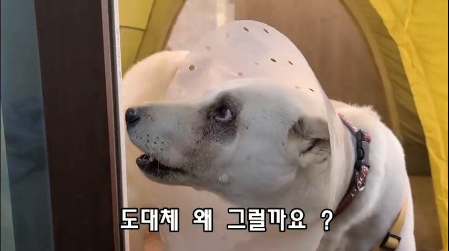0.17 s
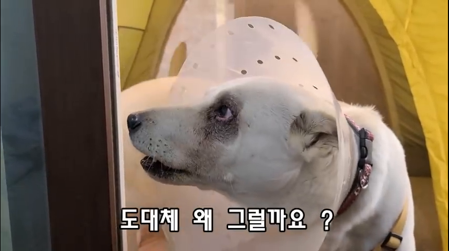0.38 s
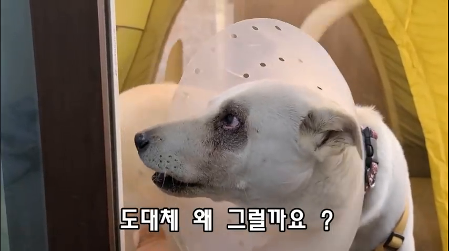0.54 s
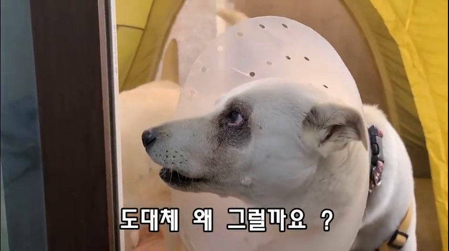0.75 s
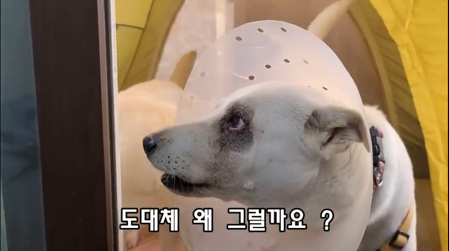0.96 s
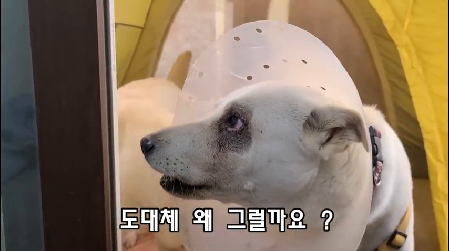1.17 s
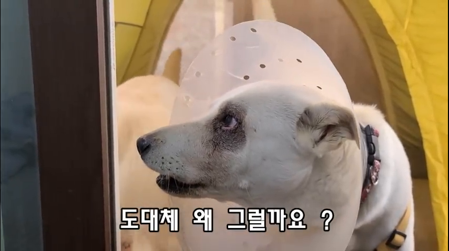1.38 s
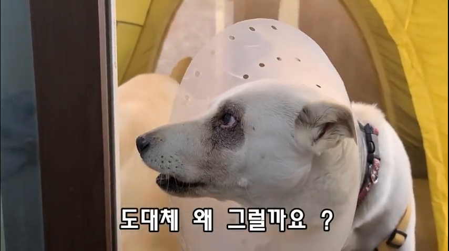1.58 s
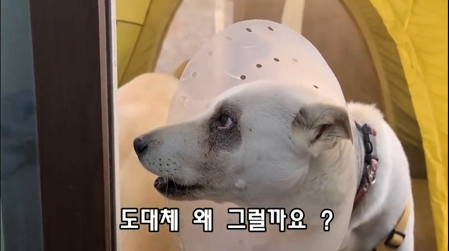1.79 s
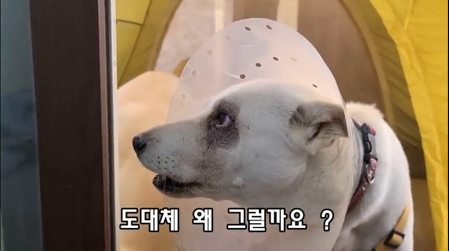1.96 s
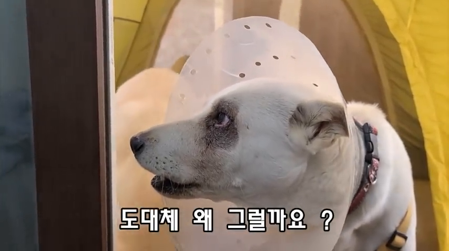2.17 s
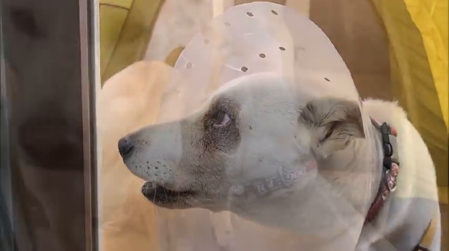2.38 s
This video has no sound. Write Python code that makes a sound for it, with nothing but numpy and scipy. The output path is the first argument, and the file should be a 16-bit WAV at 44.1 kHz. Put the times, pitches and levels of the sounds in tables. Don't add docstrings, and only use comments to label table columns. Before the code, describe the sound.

Close dog growl rising into one yelping bark, falling to a low growl, then growling again

```python
import sys
import numpy as np
from scipy import signal
from scipy.fft import rfft, irfft, next_fast_len
from scipy.io import wavfile
from scipy.ndimage import uniform_filter1d, map_coordinates

SR = 44100
rng = np.random.default_rng(int(sys.argv[2]) if len(sys.argv) > 2 else 0)


def gain_from_db(level_db):
    decades = np.asarray(level_db, float) / 20
    return 10 ** decades


def transcribe(u):
    v = np.clip(np.atleast_2d(u).T, -1, 1)
    q = np.round(v * 32767).astype(np.int16)
    wavfile.write(sys.argv[1], SR, q)


N = 107118


def unit(x):
    return x / np.sqrt(np.mean(x ** 2) + 1e-20)


def along(points, hz):
    f, v = np.transpose(points)
    return np.interp(np.log(hz + 1), np.log(f + 1), v)


def curves(tables):
    s, *cols = np.transpose(sum(tables, []))
    return [np.interp(np.arange(N) / SR, s, c) for c in cols]


def wobble(rate):
    knots = rng.standard_normal(int(N * rate / SR) + 4)
    return map_coordinates(knots, [np.arange(N) * rate / SR])


def bump(s, width):
    return np.exp(-((np.arange(N) / SR - s) / width) ** 2)


def stages(shifts_s):
    stage = np.searchsorted(shifts_s, np.arange(N) / SR)
    return stage == np.arange(len(shifts_s) + 1)[:, None]


def filtered(x, response):
    m = next_fast_len(N + SR // 2)
    return irfft(rfft(x, m) * response(np.fft.rfftfreq(m, 1 / SR)), m)[..., :N]


def tract(peaks, f):
    return sum((-1) ** k * gain_from_db(db) * 1j * f * w / (c * c - f * f + 1j * f * w)
               for k, (c, w, db) in enumerate(peaks))


def notch(shape, f):
    c, inner, outer = shape
    return (c * c - f * f + 1j * f * inner) / (c * c - f * f + 1j * f * outer)


def spread(apart):
    shared, own = rng.standard_normal((2, N))
    return shared + apart * own * np.array([[1], [-1]])


# f/Hz, level/dB (per Hz)
AIR_COLOUR = [(25, -15.5), (70, -2), (170, -18), (800, -29), (4300, -36), (6300, -55.5), (12300, -46.5),
              (15500, -52)]
# f/Hz, likeness 0-1
AIR_LIKENESS = [(60, 0.74), (240, 0.97), (950, 0.13), (3770, 0.04), (15000, 0.029)]
# f/Hz, level/dB (rms)
HUM_TONES = [(199.2, -74), (285.3, -78.5), (495.3, -87.5)]


def air():
    turn = lambda f: np.arccos(np.clip(along(AIR_LIKENESS, f), -1, 1)) / 2
    colour = lambda f: gain_from_db(along(AIR_COLOUR, f)) * [np.cos(turn(f)), np.sin(turn(f))]
    mid, side = filtered(rng.standard_normal((2, N)), colour)
    t = np.arange(N) / SR
    hum = sum(gain_from_db(db + 4.0 + 0.82 * wobble(0.9)) * np.sin(2 * np.pi * hz * t) for hz, db in HUM_TONES)
    level = gain_from_db(-64.5 + 0.43 * wobble(6.9))
    return level * np.array([mid + side, mid - side]) / np.std(mid) + hum


# f/Hz, t/s
ECHO_TIMES = [(200, 0.57), (2000, 0.098), (10000, 0.084)]
# f/Hz, level/dB
ECHO_COLOUR = [(300, -34.5), (800, -10.5), (3000, -7.5), (8000, -0.5)]


def shelter(x):
    bass_top_db = -27
    hz, t, z = signal.stft(rng.standard_normal((2, SR // 3)), SR, nperseg=256)
    tail = signal.istft(z * gain_from_db(-60 * t / along(ECHO_TIMES, hz)[:, None]), SR, nperseg=256)[1]

    def colour(f):
        db = along(ECHO_COLOUR, f)
        return gain_from_db(np.where(f < 700, np.minimum(db, bass_top_db), db))

    delayed = np.pad(filtered(x.mean(axis=0), colour), (300, 0))
    return signal.fftconvolve(delayed[None], tail / np.linalg.norm(tail[0]), axes=1)[:, :N]


# t/s, f/Hz, level/dB, time to fall 60 dB t/s
TAG_TICK = (.944, 4450, -64, .015)


def collar_tag():
    s, hz, db, t60 = TAG_TICK
    t = np.clip(np.arange(N) / SR - s, 0, 1)
    return gain_from_db(db - 60 * t / t60) * np.sin(2 * np.pi * hz * t)


# t/s, length t/s, level/dB
SNUFFLE_PUFFS = [
    (0.774, .06, -61),
    (0.866, .08, -78),
    (1.301, 0.26, -79),
    (1.577, 0.13, -72.5),
    (1.737, 0.176, -70.5),
    (1.867, .08, -75.5),
]
# f/Hz, width f/Hz, level/dB
SNOUT_PEAKS = [(480, 300, 0), (960, 200, -4), (1650, 300, -5), (2530, 300, -4)]


def snuffles():
    puffs = sum(gain_from_db(db) * bump(s, length / 2) for s, length, db in SNUFFLE_PUFFS) * gain_from_db(3.4 * wobble(90))
    return puffs * unit(filtered(rng.standard_normal(N), lambda f: tract(SNOUT_PEAKS, f) ** 2))


# t/s, width t/s, level/dB
SIGH_PUFFS = [
    (.745, 0.019, -54.5),
    (0.789, 0.027, -64),
]
# f/Hz, width f/Hz, level/dB
LIP_PEAKS = [(958, 49, -3.5), (1340, 100, -6), (1920, 91, -7), (2530, 88, 5.5), (3300, 120, -7),
             (3934, 51, -12), (4800, 90, -14.5), (5280, 66, -15)]


def sigh():
    puffs = sum(gain_from_db(db) * bump(s, width) for s, width, db in SIGH_PUFFS)
    return puffs * unit(filtered(rng.standard_normal(N), lambda f: tract(LIP_PEAKS, f)))


# f/Hz, level/dB (per Hz)
HISS_COLOUR = [(1180, -34), (2000, -14), (2200, -11.5), (5270, 0), (5940, -9.5), (6530, -1.5),
               (15500, -14.5)]


def blast(hz, db, gate):
    grows_db, lag_s = 13, 0.0033
    effort_db = uniform_filter1d(db, size=1323) - db.max()
    blast_db = np.roll(grows_db * np.log2(hz / hz.max()) + effort_db, round(lag_s * SR))
    hiss = unit(filtered(spread(.8) * (.5 + gate), lambda f: gain_from_db(along(HISS_COLOUR, f))))
    thud = unit(filtered(spread(.7), lambda f: f / (20 + f) / (1 + (f / 120) ** 2)))
    return gain_from_db(blast_db) * (gain_from_db(-26.5) * hiss + gain_from_db(-40) * thud)


# t/s, level/dB, level/dB of its octave over it
CHEST_LEVELS = [
    [(0, -42.5, 0.5), (.1, -34.5, 1), (.14, -41, 3.5), (.27, -41.5, 0), (.32, -43, -0.5), (.39, -40, -11.5),
     (.454, -37.5, 1), (.6, -35, -1.5), (.715, -34, -7.5), (.75, -40, -19), (.79, -72.5, -10)],
    [(1.885, -86, -8), (1.9, -71, 3), (1.925, -29, -4), (1.96, -32.5, -2.5), (2.33, -29.5, -5)],
]


def chest_tone(turns, loose, lead, choke_db, rough):
    chest_db, octave_db = curves(CHEST_LEVELS)
    low = np.sin(2 * np.pi * (turns + .27 * lead))
    octave_turns = 2 * (turns + .65 * (loose - turns)) - 0.5
    octave = gain_from_db(octave_db - .5 * choke_db) * np.sin(2 * np.pi * octave_turns)
    return np.sqrt(2) * gain_from_db(chest_db + 10 * rough * wobble(60)) * (low + octave)


# t/s, width t/s, level/dB
RASP_BURSTS = [
    (0, .02, -40),
    (.12, .008, -24),
    (.133, .008, -18),
    (.205, .008, -33),
]
# f/Hz, width f/Hz, level/dB
RASP_PEAKS = [(1040, 130, 0), (1350, 120, -3), (1700, 130, 1), (2220, 130, -2), (2540, 110, -1),
              (4500, 2500, -16)]


def rasps(gate):
    bursts = sum(gain_from_db(db) * bump(s, width) for s, width, db in RASP_BURSTS) * (.5 + gate)
    return bursts * unit(filtered(rng.standard_normal(N), lambda f: tract(RASP_PEAKS, f) ** 2))


# centre t/s, width t/s, level/dB
HALF_TONE = (.182, 0.02, -29.5)


def half_tone(loose):
    s, width, db = HALF_TONE
    return gain_from_db(db) * bump(s, width) * np.sin(np.pi * loose)


# f/Hz, width f/Hz, level/dB
JAW_PEAKS = [
    [(1320, 330, -11.5), (1841, 90, -6), (2352, 260, -17.5), (2510, 37, -5), (3208, 102, -13.5)],
    [(1353, 100, 2), (1798, 98, 0), (2210, 73, -3), (2710, 94, -26.5), (2890, 89, -7)],
    [(1400, 110, 3), (1739, 130, -9), (2210, 65, -1.5), (2650, 84, -29.5), (3017, 69, 0.5)],
]
JAW_SHIFTS = [1.3, 2.18]


def jaws(folds, breath, size, db, rough):
    shut = gain_from_db(-30 + (0.87 - 1) * (db - db.max()))
    blown = (folds + 2.2 * breath / (rough + 0.17)) * size * shut
    voice = np.zeros(N)
    for on, peaks in zip(stages(JAW_SHIFTS), JAW_PEAKS):
        for peak in peaks:
            patchy = blown * on * gain_from_db(3 * wobble(20))
            voice += filtered(patchy, lambda f: tract([peak], f))
    return voice


# f/Hz, width f/Hz, level/dB
MOUTH_PEAKS = [(934, 140, 12), (1460, 190, 2), (1556, 180, -1), (2280, 59, -10.5), (2504.6, 88, 1),
               (3180, 340, -8), (3330, 150, -16), (4450, 360, -14.5), (5550, 1600, -18.5),
               (6730, 2100, -21.5), (8850, 1600, -10), (11570, 4600, -25.5)]


def mouth(folds, breath, size, mouth_db):
    return filtered((folds + 3 * breath) * size * gain_from_db(mouth_db), lambda f: tract(MOUTH_PEAKS, f))


# f/Hz, width f/Hz, level/dB
THROAT_PEAKS = [
    [(371.7, 260, 3), (545, 260, 5)],
    [(353.5, 210, 0.5), (480, 190, 5.5)],
    [(405, 194.4, 5), (537, 280, 4.5)],
]
# f/Hz, width f/Hz, level/dB
NOSE_PEAKS = [
    [(900, 84, -26.5)],
    [(880, 113, -28)],
    [(916, 150, -19)],
]
THROAT_SHIFTS = [.6, 1.3]
# f/Hz, inner width f/Hz, outer
# width f/Hz
THROAT_BRANCH = (740, 89, 87)


def throat(folds, breath, size, hz):
    shapes = stages(THROAT_SHIFTS)

    def passed(f, i):
        ring = tract(THROAT_PEAKS[i], f) ** 3 * notch(THROAT_BRANCH, f) + tract(NOSE_PEAKS[i], f)
        return ring * np.exp(2j * np.pi * f * 0.005)

    overtones = np.arange(1, 9)[:, None] * hz
    gain = sum(on * passed(overtones, i) for i, on in enumerate(shapes))
    passes = uniform_filter1d(np.sqrt(np.sum(abs(gain) ** 2, axis=0) / 2), size=441)
    source = (folds + breath) * size / passes
    return sum(filtered(source * on, lambda f: passed(f, i)) for i, on in enumerate(shapes))


# t/s, depth level/dB, lead lost in cycles
CHOKE_MOMENTS = [(0.436, 5, 0.062), (0.468, 5, .06), (.53, 2.5, .02), (0.598, 4.5, 0.05), (1.945, 3, .2),
                 (1.975, 11.5, .3), (2.008, 7.5, .36), (2.037, 9.5, .38), (2.072, 3, 0.43),
                 (2.106, 16, 0.42), (2.145, 9.5, .33), (2.184, 12.5, .35), (2.222, 7.5, .33),
                 (2.255, 9, .3), (2.294, 10, .3), (2.335, 0.5, 0.28)]


def flutter():
    choke_s, run_up_s = .0078, .04
    t = np.arange(N) / SR
    s, db, lead = np.transpose(CHOKE_MOMENTS)[:, :, None]
    bells = bump(s, choke_s)
    run_s = np.minimum(np.diff(s, axis=0, prepend=0), run_up_s)
    run = np.clip(1 + (t - s) / run_s, 0, 1)
    back = np.cumsum(bells, axis=1) / bells.sum(axis=1, keepdims=True)
    return np.sum(db * bells, axis=0), np.sum(lead * (run - back), axis=0)


# t/s, f/Hz
VOICE_PITCH = [
    [(0, 189.7), (.048, 162.3), (.088, 207.9), (.113, 253.4), (.126, 405), (.138, 505.8)],
    [(.16, 562.2), (.188, 603.8), (.201, 624.4), (.214, 565.8), (.222, 503.8), (.235, 391.3), (.25, 285.2),
     (.274, 188.5)],
    [(.302, 156.1), (.37, 142), (.454, 128.6), (.586, 120.8), (.674, 115.8), (.722, 110.6), (.78, 92.65)],
    [(1.896, 102.4), (1.924, 103.2), (1.956, 111.7), (1.99, 115.7), (2.07, 118.8), (2.2, 119.3),
     (2.33, 118.8)],
]
# t/s, throat level/dB, mouth level/dB, roughness 0-1
VOICE_EFFORT = [
    [(0, -13, -30.5, 0.18), (.018, -32, -25.5, 0.37), (.06, -31, -37, 0.23), (.075, -18, -31.5, 0.1),
     (.112, -12.5, -26.5, 0.21), (.122, -14.5, -14.5, 0), (.134, -11, -20, 0)],
    [(.143, -5, -16, 0.09), (.155, -8, -14, 0.07), (.175, -5.5, -17.5, 0.07), (.197, -10.5, -11.5, 0.04),
     (.203, -16.5, -8.5, 0.14), (.206, -23.5, -1, 0.2), (.214, -5.5, -19, 0.2), (.224, -13.5, -20.5, 0),
     (.229, -20, -12.5, 0.2)],
    [(.249, -18, -26, 0.5), (.26, -17.5, -27, 0.52), (.285, -28, -46, 0.24), (.33, -27, -56, 0.11),
     (.42, -26, -59, 0.06), (.5, -29, -53, 0.09), (.586, -32.5, -62, 0.21), (.64, -28, -59.5, 0),
     (.722, -30, -50.5, 0.24), (.745, -53, -16.5, 0.23), (.8, -88, -15.5, 0.42)],
    [(1.885, -67, -36.5, 0.37), (1.899, -55.5, -31.5, 0.32), (1.904, -34.5, -43, 0.22),
     (1.915, -35, -40, 0.35), (1.93, -20.5, -50.5, 0.19), (2.05, -18.5, -40.5, 0.12),
     (2.33, -20, -42.5, 0.11)],
]
# f/Hz, inner width f/Hz, outer width f/Hz
SIDE_BRANCH = (1143, 13, 160)


def dog():
    (hz,), (db, mouth_db, rough) = curves(VOICE_PITCH), curves(VOICE_EFFORT)
    rough = np.clip(rough, 0, 1)
    choke_db, lead = flutter()
    turns = np.cumsum(hz) / SR
    loose = turns + lead + 0.21 * rough * wobble(90)
    k = np.arange(1, 41)[:, None]
    folds = np.sum(np.cos(2 * np.pi * k * loose) * (k * hz < 7000), axis=0)
    gate = (.5 + .5 * np.cos(2 * np.pi * loose)) ** 0.49
    breath = gain_from_db(-8.5) * rough * gate * rng.standard_normal(N) * np.sqrt(SR / hz)
    size = gain_from_db(db - choke_db + 5 * rough * wobble(110))
    voice = throat(folds, breath, size, hz) + mouth(folds, breath, size, mouth_db)
    voice += jaws(folds, breath, size, db, rough) + half_tone(loose) + rasps(gate)
    voice = filtered(voice, lambda f: notch(SIDE_BRANCH, f))
    return voice + chest_tone(turns, loose, lead, choke_db, rough) + blast(hz, db, gate)


# f/Hz, level/dB
PORT_TILT = [(100, 0.6), (500, 0.5), (1000, 5), (2400, -7), (5000, -1), (15000, -10.5)]


def scene():
    lead_s = 0.00015
    x = dog() + snuffles() + sigh() + collar_tag()
    half = np.array([[.5], [-.5]])
    port = lambda f: gain_from_db(half * along(PORT_TILT, f)) * np.exp(2j * np.pi * half * lead_s * f)
    return filtered(x, port) + shelter(x) + air()


CLOCK_IMAGES = [-39.5, -45, -47, -50]


def converter(dry):
    clock_hz, image_hz = 3900, 506
    t = np.arange(N) / SR
    clock = sum(gain_from_db(db) * np.cos(2 * np.pi * (k + 1) * clock_hz * t) for k, db in enumerate(CLOCK_IMAGES))
    grain = gain_from_db(-44) * filtered(rng.standard_normal((2, N)), lambda f: f > 4000)
    slope = filtered(dry, lambda f: 1j * f / image_hz / (1 + (f / image_hz / 2) ** 4))
    return dry + slope * (2 * clock + grain)


def low_pass(x):
    return signal.sosfilt(signal.butter(12, 15670, fs=SR, output="sos"), x)


def record(dry):
    cut_s, fade_s, after_s = 2.3292, .0012, .028
    t = np.arange(N) / SR
    kept = converter(dry) * np.clip((cut_s - t) / fade_s, 0, 1)
    kept = filtered(kept, lambda f: f < 15700)
    left = gain_from_db(-49) * np.clip(1 - (t - cut_s) / after_s, 0, 1) * (t > cut_s)
    remnant = filtered(dry * left, lambda f: f < 700)
    return low_pass(np.clip(kept + remnant, -1, 1))


dry = scene()
out = record(dry)
transcribe(out)
```